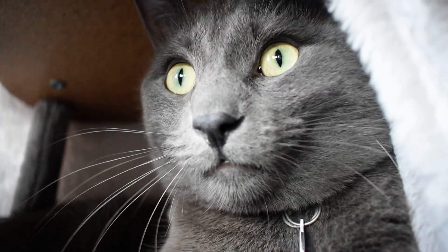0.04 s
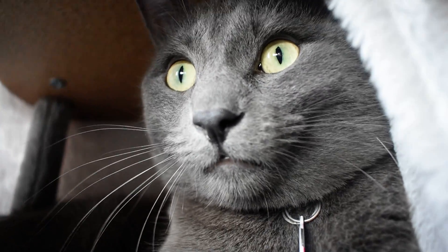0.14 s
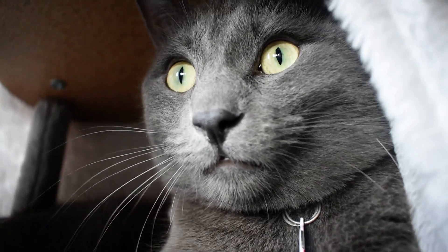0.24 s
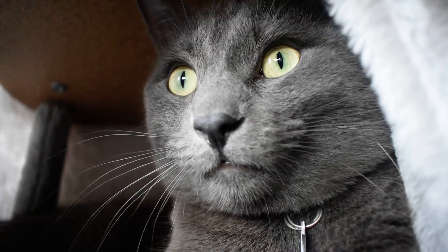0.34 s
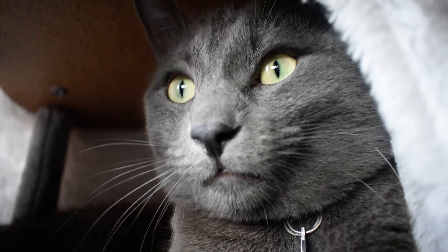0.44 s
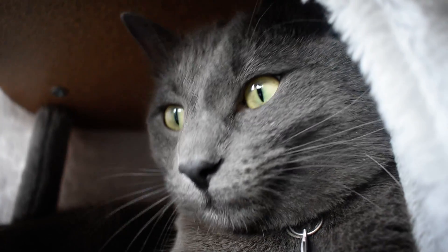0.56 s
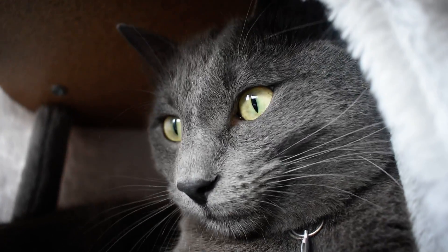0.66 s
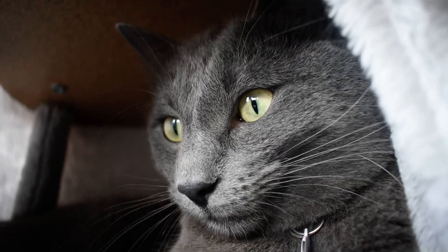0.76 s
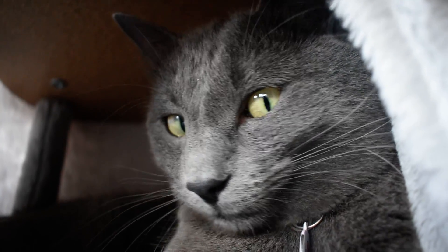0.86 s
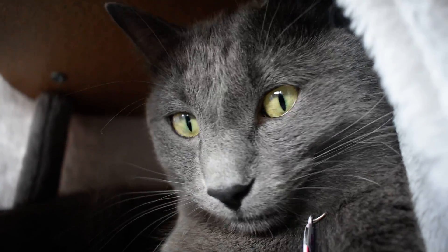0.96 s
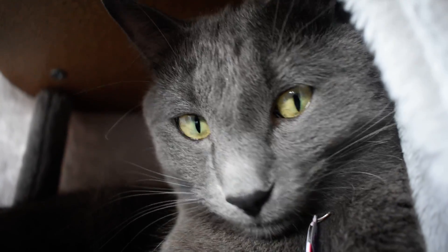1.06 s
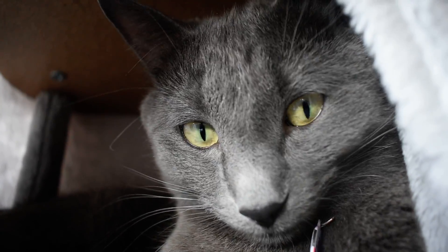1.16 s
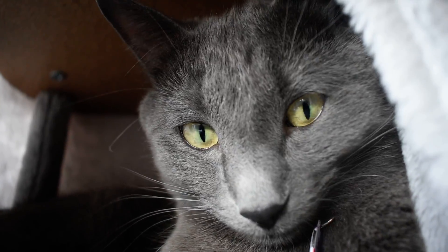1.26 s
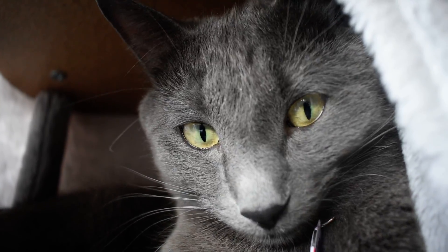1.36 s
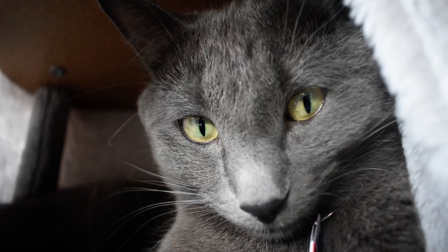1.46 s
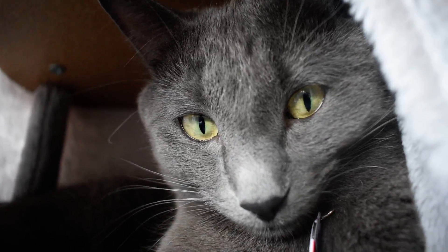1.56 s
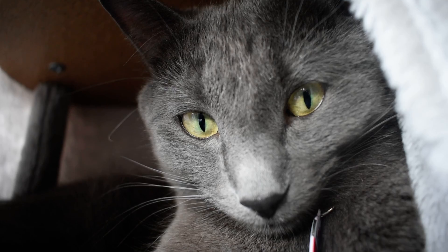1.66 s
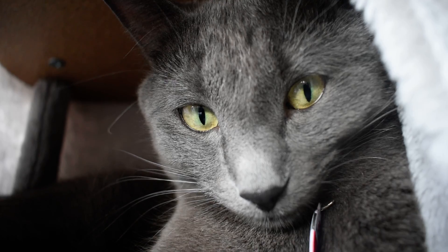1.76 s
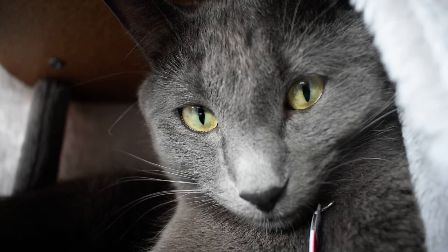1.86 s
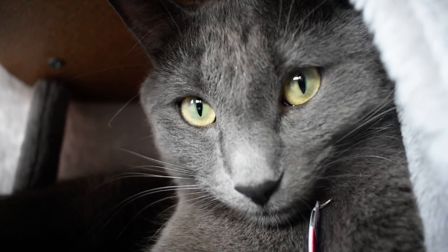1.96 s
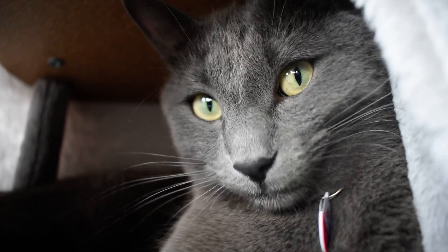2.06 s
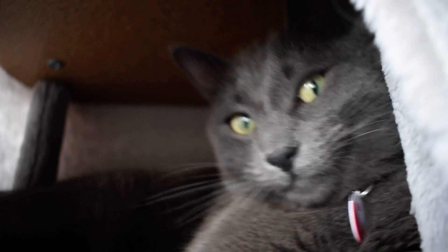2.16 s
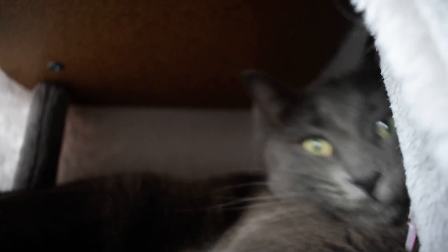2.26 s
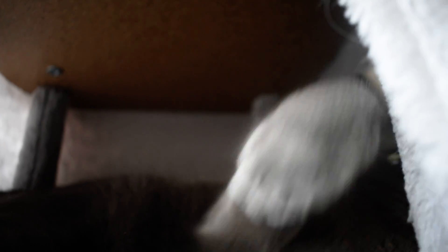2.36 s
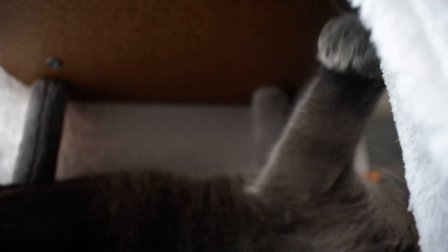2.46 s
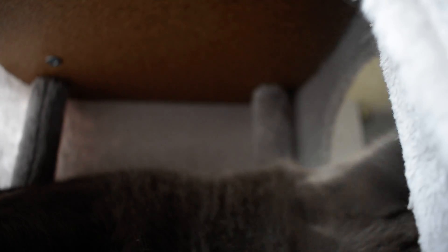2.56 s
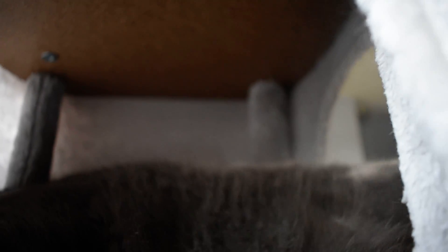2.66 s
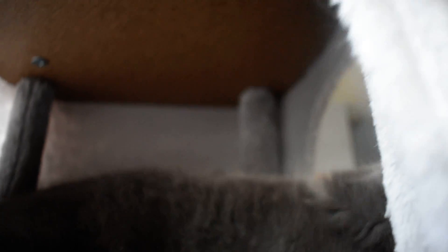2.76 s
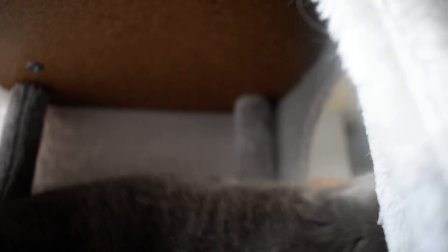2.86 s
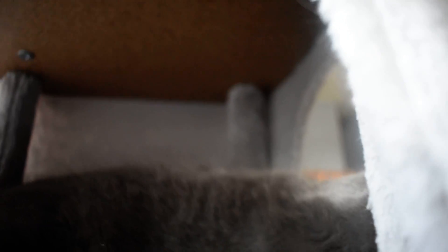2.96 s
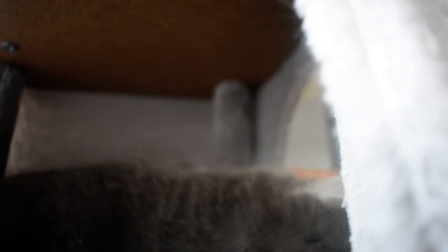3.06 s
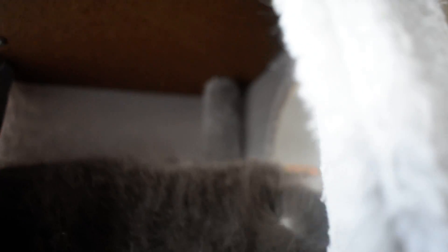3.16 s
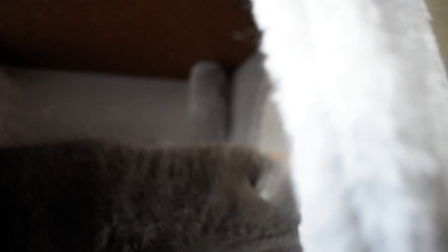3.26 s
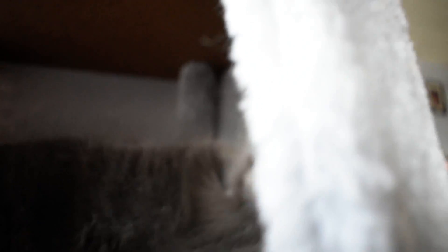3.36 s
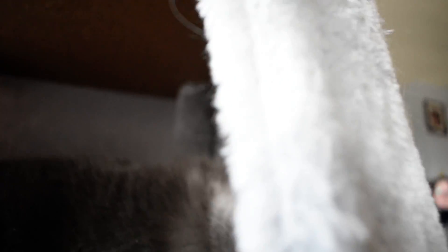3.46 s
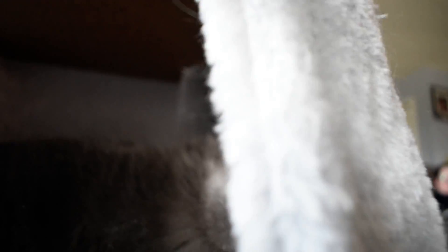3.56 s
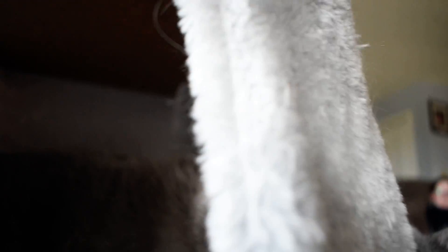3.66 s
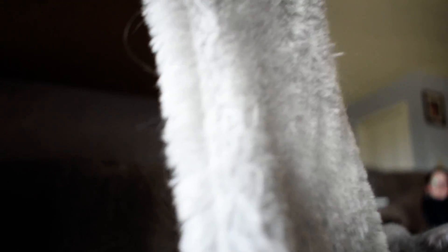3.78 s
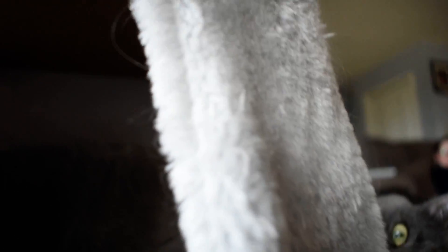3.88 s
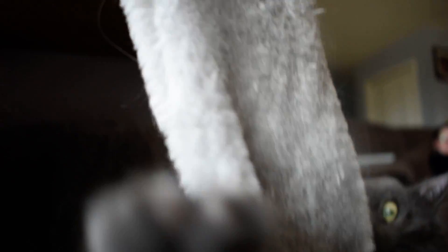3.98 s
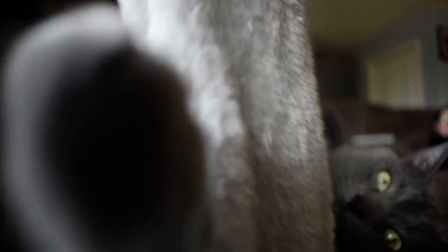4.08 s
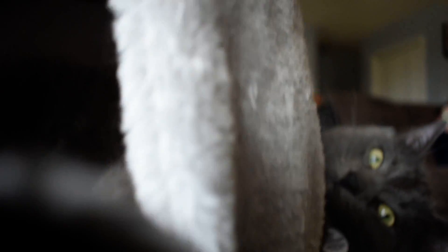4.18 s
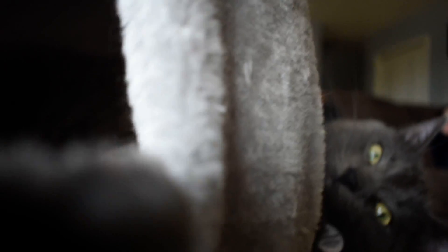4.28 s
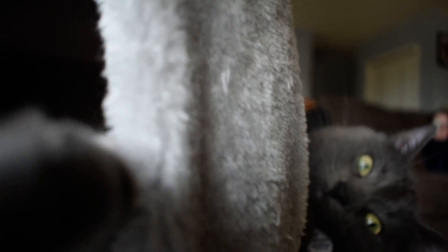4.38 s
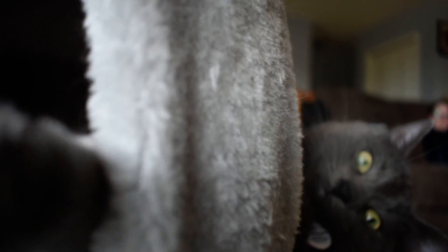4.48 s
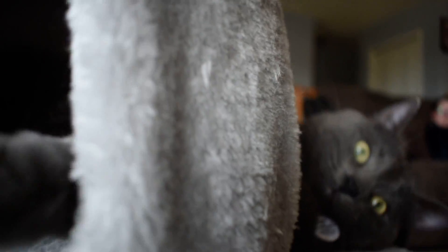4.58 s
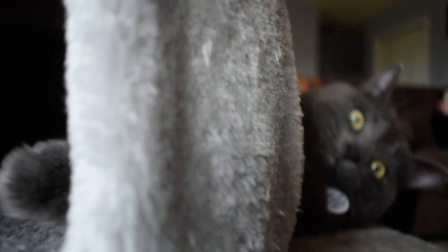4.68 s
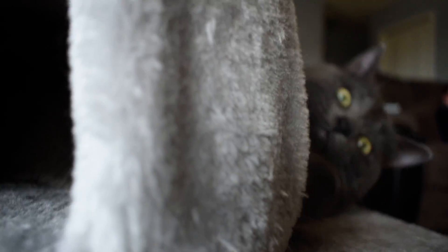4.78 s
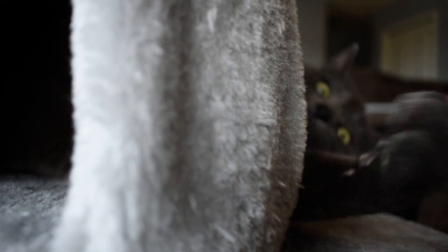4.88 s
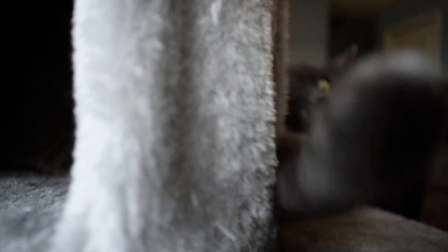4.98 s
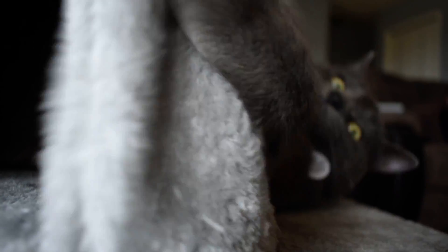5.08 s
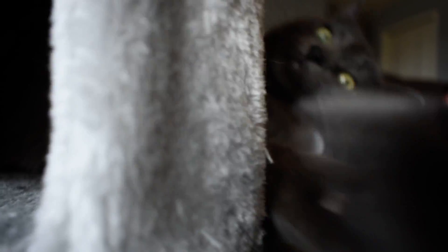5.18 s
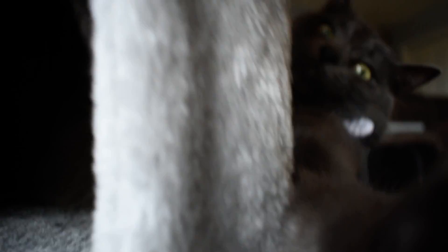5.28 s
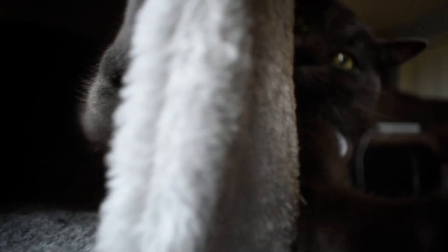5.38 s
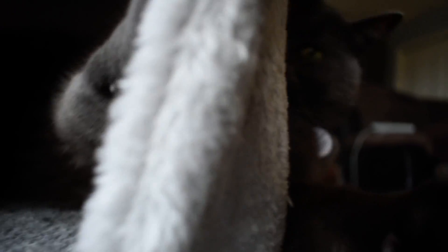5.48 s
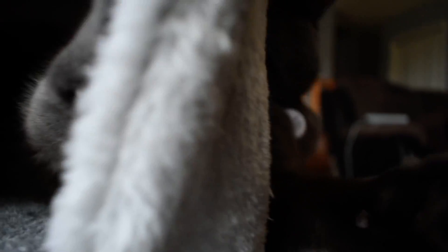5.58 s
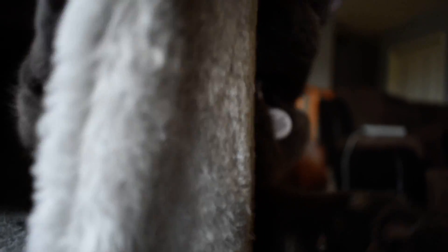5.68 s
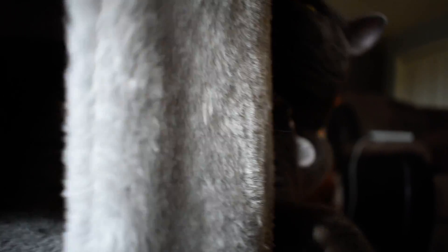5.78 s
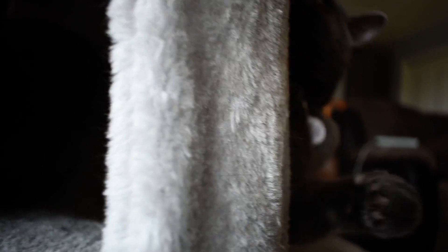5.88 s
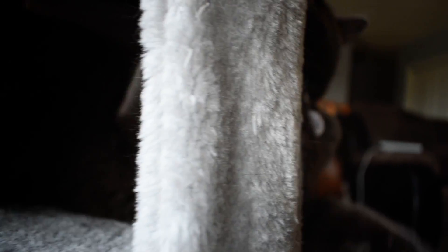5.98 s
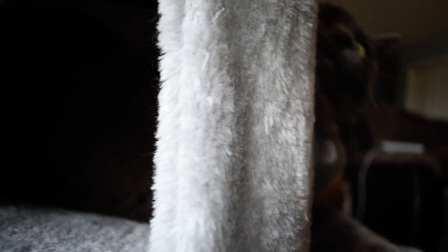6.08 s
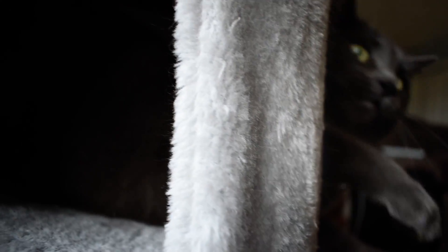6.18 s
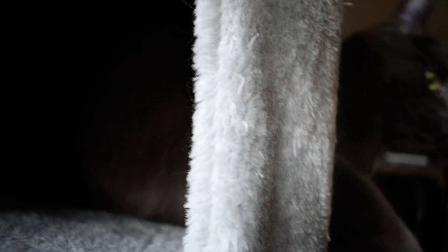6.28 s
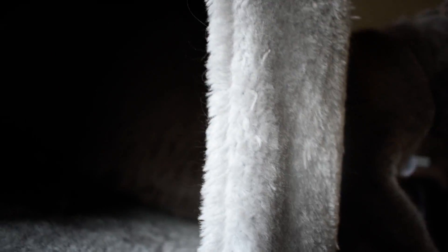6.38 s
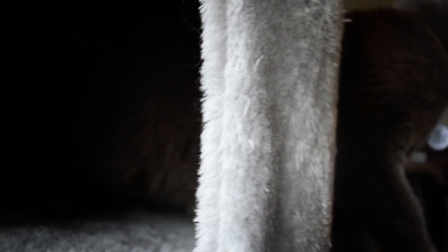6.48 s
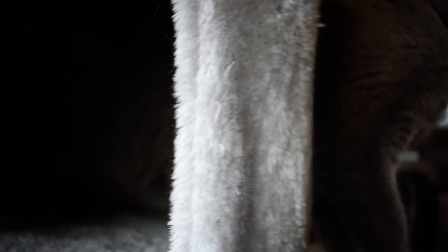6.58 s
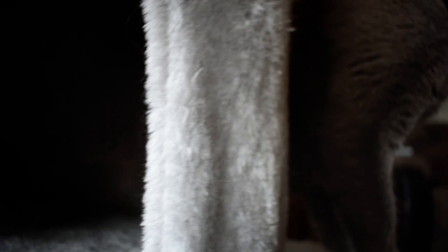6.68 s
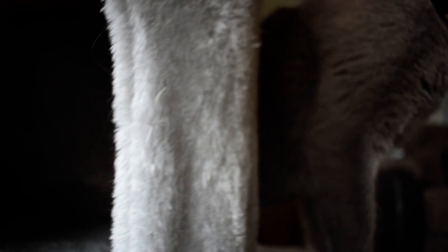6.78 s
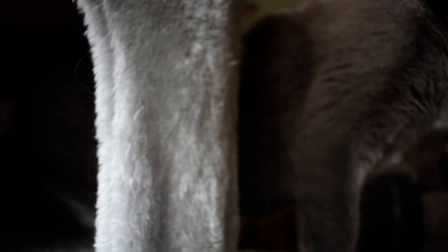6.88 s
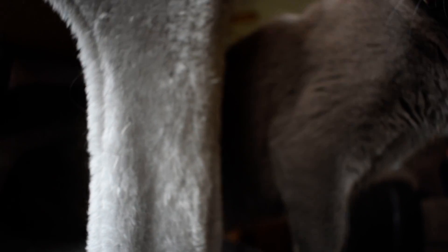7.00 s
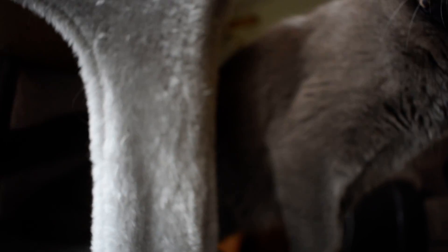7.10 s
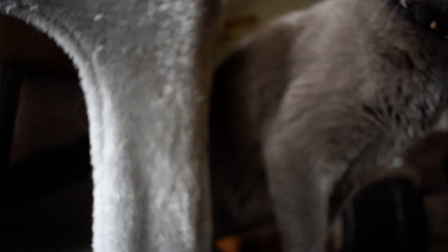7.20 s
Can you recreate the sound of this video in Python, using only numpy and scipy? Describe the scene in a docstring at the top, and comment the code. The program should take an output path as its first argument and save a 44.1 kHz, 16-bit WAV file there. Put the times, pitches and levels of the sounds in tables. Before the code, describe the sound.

Fur and plush rustle close to the microphone as a cat paws at it, with soft bumps and one sharp, rattling knock.

```python
"""Fur and plush rustle close to the microphone as a cat shifts in a cat tree and bats at a handheld camera.
Hair tips hiss and the backing cloth rubs; paws skid, claws snap free of the pile, and blows ring the
camera case, one swat landing as a sharp rattling knock. The collar tag rings with a faint dull clack
at first; later come two far wooden clunks, over a quiet room's appliance hum."""
import sys
import numpy as np
from scipy import signal
from scipy.fft import rfft, irfft
from scipy.io import wavfile

SR = 44100
rng = np.random.default_rng(int(sys.argv[2]) if len(sys.argv) > 2 else 0)


def dump(signal):
    """Clip the signal to [-1, 1] and save it as 16-bit WAV at the path in sys.argv[1]."""
    limited = np.clip(np.atleast_2d(signal).T, -1, 1)
    pcm = np.round(limited * 32767).astype(np.int16)
    wavfile.write(sys.argv[1], SR, pcm)


N = 319501
T = np.arange(N) / SR


def rustle(hissing, rubbing, catch_db=1.04, catch_hz=35):
    """Hair tips hiss, the cloth behind them rubs; both catch and slide together."""
    # spectra: f/Hz, level/dB
    hairs = [(300, -34), (1500, -8.5), (3000, 3.5), (4500, 3), (6800, 6), (8400, 2.5), (10000, -9),
             (12000, -19.5), (16000, -31)]
    backing = [(100, -17.5), (330, -2), (520, -2), (630, 2.5), (750, 2), (950, -2), (1300, -1.5),
               (2000, -1), (3000, -7.5), (5000, -13), (12000, -51)]
    hiss = colour(slips(N, per_s=6000, spread_db=1.0), hairs) * hissing
    rub = colour(slips(N), backing) * rubbing
    return (hiss + rub) * amp(catch_db * drift(catch_hz))


def sliding(rub_trim_db=-1.14):
    """Hiss and rub envelopes: fur gathers speed over plush, then stops; overlaps add in power."""
    # fur slides: t/s, swell/s, fade/s, hiss/dB, rub/dB
    slides = [(0.2, 0.18, 0.38, -63.5, -62), (0.48, 0.095, 0.071, -58.5, -55),
              (0.785, .03, 0.075, -58, -62), (0.98, 0.072, 0.057, -68, -66), (1.21, 0.15, .2, -59.5, -60),
              (1.36, 0.3, 0.079, -59, -51.5), (1.98, 0.27, 0.12, -59, -55.5), (2.6, 0.21, .15, -64, -54.5),
              (2.88, .06, .1, -63, -62), (3.102, 0.15, 0.34, -58, -56.5), (3.31, .012, .1, -49, -51),
              (3.35, .035, 0.061, -40.5, -43.5), (3.518, .16, 0.075, -46.5, -47.5),
              (3.77, 0.075, 0.098, -46, -53), (3.944, 0.023, 0.067, -46.5, -46),
              (4.14, 0.038, .12, -57, -56.5), (4.338, 0.035, 0.14, -57, -50),
              (4.715, .02, .12, -63.5, -58.5), (4.908, 0.061, 0.23, -53, -58),
              (5.08, 0.18, 0.26, -51.5, -55), (5.49, 0.066, 0.084, -54, -57.5), (5.72, 0.18, .06, -51, -56),
              (5.921, .14, 0.12, -46.5, -44), (6.17, 0.14, 0.066, -54, -60.5),
              (6.4, 0.096, .35, -64, -61.5), (6.76, 0.18, 0.21, -60.5, -61), (7.07, 0.16, 0.14, -58.5, -52)]
    power = np.zeros((2, N))
    for s, swell_s, fade_s, hiss_db, rub_db in slides:
        t = np.maximum(T - s, 0)
        swell = np.sin(np.pi / 2 * np.minimum(t / swell_s, 1)) ** 0.71
        fade = np.exp(-(np.maximum(t - swell_s, 0) / fade_s) ** 0.9)
        power += (amp([[hiss_db], [rub_db + rub_trim_db]]) * swell * fade) ** 2
    return np.sqrt(power)


def hollow(rubbing, hz=735, share_db=-9):
    """Rubbing excites one air resonance of the plush den."""
    return amp(share_db) * rubbing * unit(focus(slips(N), hz, octaves=0.24))


def blows(hard_db=-19):
    """A push and a short scuff ring the camera case; in hard blows a claw scrapes too."""
    # paw and claw hits, swat at 5.27 s: t/s, level over 10 ms/dB, f/Hz, width/oct
    hits = [(0.176, -53, 615, 0.4), (0.361, -54, 1200, 2), (0.551, -49, 1700, 1.3),
            (0.6341, -52, 1800, 0.94), (0.933, -50.5, 219, 0.89), (1.2, -55.5, 895, 0.96),
            (2.32, -46, 220, 1.5), (2.329, -44.5, 484, 2.3), (2.749, -50, 2290, 1.2),
            (2.761, -46.5, 2100, 1.2), (2.831, -51.5, 1200, 1.8), (3.032, -43.5, 222, 0.26),
            (3.665, -39.5, 330, 1.8), (4.088, -42.5, 88, 0.44), (4.1613, -38.5, 1910, 0.95),
            (4.1638, -38, 485, 1.25), (5.2708, -22, 5320, 0.35), (5.2713, -27, 239, 0.59),
            (5.2793, -20.5, 1700, 0.83), (5.285, -18.5, 1380, 0.32), (5.2902, -32, 4670, 0.61),
            (5.2961, -27, 286, 0.72), (5.2967, -26.5, 1900, 1), (5.3162, -45, 3840, 1.3),
            (5.3674, -41.5, 230, 1.1)]
    # case modes: f/Hz, level/dB, t60/s
    modes = [(130, -19, .05), (244, -4.5, 0.03), (414, -2.5, 0.021), (600, -20, .02), (703, 1, 0.013),
             (997, 2.5, 0.015), (1360, -9.5, 0.02), (1510, -1, 0.016), (1670, -6.5, 0.034),
             (2204, 0.5, 0.0071), (2750, 5, 0.0054), (3620, -1.5, 0.0076), (4650, 2, 0.0028),
             (6500, -0.5, 0.0024), (8200, -4, 0.0092)]
    out, t = np.zeros(N), T[:SR // 8]
    case = sum(amp(db - 60 * t / t60) * np.sin(2 * np.pi * hz * t) for hz, db, t60 in modes)
    for s, db, hz, octaves in hits + patter():
        push = amp(0.15 * (db - hard_db)) * (t == 0)
        scuff_s = 0.0024 * (1000 / hz) ** 0.43  # low, padded blows stay longer
        scuff = 0.13 * slips(len(t)) * np.exp(-t / scuff_s)
        ring = focus(signal.fftconvolve(push + scuff, case)[:len(t)], hz, octaves)
        rms_10ms = np.sqrt(np.sum(ring ** 2) / (SR / 100))
        add(out, s, amp(db) * ring / rms_10ms)
        scrape = skid(hz=8370, octaves=1.0, fade_s=0.0028, rise_s=0.00075, top_hz=9800)
        add(out, s, amp(-23 + 1.67 * (db - hard_db)) * scrape)
    return out


def patter(span_s=(0.082, 0.97), per_s=13, db=-56, hz=746, octaves=0.89):
    """Faint, loosely spaced handling taps, as rows for blows()."""
    slots = np.arange(*span_s, 1 / per_s)
    jitter = rng.uniform(-1, 1, (len(slots), 3))
    return [(s + (1 + late) / (2 * per_s), db - softer_db, hz * 2 ** (0.4 * pitch), octaves)
            for s, (late, softer_db, pitch) in zip(slots, jitter)]


def shoves():
    """One slow pressure swing each time the whole camera is pushed."""
    # pushes: t/s, level/dB, time constant/s
    pushes = [(4.051, -46, 0.0045), (5.275, -31, 0.0014), (5.301, -36, 0.0025), (5.372, -46.5, 0.0048),
              (5.642, -49, 0.0056)]
    out = np.zeros(N)
    for s, db, tau_s in pushes:
        u = T[:SR // 8] / tau_s
        add(out, s, amp(db) * 2 * u * (2 - u) * np.exp(-u))
    return out


def skids():
    """Short hissy skids: paw brushes on the pile, plus the bright edge of the two far clunks."""
    # bursts: t/s, level/dB, f/Hz, width/oct, fade/s
    bursts = [(1.531, -36.5, 7600, 0.21, 0.004), (1.54, -53, 6500, 0.56, 0.036),
              (2.748, -49, 7000, 0.63, 0.013), (3.316, -43, 8600, 0.21, 0.056),
              (3.522, -45.5, 6460, 0.68, 0.036), (3.569, -42.5, 7450, 1.8, 0.015),
              (3.9506, -41, 7200, 0.38, 0.031), (4.497, -51.5, 6500, 1.8, 0.027),
              (5.264, -29, 1030, 1.4, 0.025), (5.312, -25, 1600, 1.8, 0.0049),
              (5.322, -37.5, 7000, 0.67, 0.023), (5.507, -47.5, 1570, 0.4, 0.095)]
    out = np.zeros(N)
    for s, db, hz, octaves, fade_s in bursts:
        add(out, s, amp(db) * skid(hz, octaves, fade_s))
    return out


def skid(hz, octaves, fade_s, rise_s=0.0014, top_hz=8700):
    """A band of gritty hiss that starts fast and fades."""
    t = T[:SR // 3]
    hiss = unit(muffle(focus(slips(len(t)), hz, octaves), top_hz))
    return hiss * (1 - np.exp(-t / rise_s)) * np.exp(-t / fade_s)


def snags(rasp_s=0.00092):
    """A thread lets go of a claw with a tiny snap."""
    # releases: t/s, peak/dB, f/Hz
    releases = [(2.622, -40.5, 4800), (5.661, -36, 5030), (5.877, -25.5, 5050), (6.205, -26.5, 4350),
                (6.4643, -40, 5500), (6.538, -29, 7000), (6.791, -35.5, 7300), (7.1846, -26, 6500),
                (7.216, -31.5, 6200)]
    out, t = np.zeros(N), T[:SR // 50]
    for s, db, hz in releases:
        rasp = 0.086 * slips(len(t)) * np.exp(-t / rasp_s)
        snap = muffle(focus((t == 0) + rasp, hz, octaves=1.0), top_hz=1.34 * hz)
        add(out, s, amp(db) * snap / abs(snap).max())
    return out


def tag(rise_s=0.00081):
    """The metal disc on the collar taps its ring and rings out."""
    # disc modes: f/Hz, level/dB, t60/s
    modes = [(1040, -60, .3), (1620, -61, 0.32), (2460, -59, 0.25), (4021, -70, .4), (4140, -65, .3),
             (5023, -69, 0.32), (5313, -72, .3), (6040, -56, 0.16), (6347, -65, 0.28), (6800, -57, 0.18),
             (7050, -58, 0.33), (7720, -60, .28), (9130, -57, 0.19)]
    # taps: t/s, gain/dB
    taps = [(0.0, 2), (0.039, -1)]
    out, t = np.zeros(N), T[:SR // 2]
    for s, tap_db in taps:
        ring = sum(amp(db - 60 * t / t60) * np.sin(2 * np.pi * (hz * t + rng.random()))
                   for hz, db, t60 in modes)
        add(out, s, amp(tap_db) * ring * (1 - np.exp(-t / rise_s)))
    return out


def clunks(clatter_s=0.0046, rise_s=0.001):
    """The tag's dull clack, then two far wooden clunks: brief clatter, then mostly the room."""
    # knocks: t/s, level/dB, f/Hz, width/oct
    knocks = [(0.002, -51, 800, 1.9), (1.5335, -33, 750, 0.61), (1.54, -48, 130, 0.94),
              (1.5414, -38, 1200, 0.77), (1.5805, -39.5, 950, 0.55), (4.478, -39.5, 1600, 0.59),
              (4.493, -39.5, 610, 0.35), (4.502, -45.5, 2030, 0.58), (4.516, -40, 1110, 0.79)]
    out = np.zeros(N)
    for s, db, hz, octaves in knocks:
        tail = room_tail()
        t = T[:len(tail)]
        clatter = 2.2 * slips(len(t)) * np.exp(-t / clatter_s)
        edges = (1 - np.exp(-t / rise_s)) * np.minimum(1, 10 * (1 - t / t[-1]))
        clunk = focus(wood(tail + clatter) * edges, hz, octaves)
        add(out, s, amp(db) * clunk / np.std(clunk[:SR // 25]))
    return muffle(out, top_hz=8500)


def wood(x):
    """Broad resonances of a wooden board."""
    # board modes: f/Hz, width/Hz, level/dB
    modes = [(112, 9, 5), (260, 240, -4.5), (604, 160, -1), (773, 69, 2.5), (790, 98, -6), (936, 70, 1.5),
             (1217, 37, 5.5), (1360, 150, -5.5), (1700, 380, -5), (2200, 220, -2.5), (2700, 330, -7.5),
             (3170, 230, -2.5), (4200, 1900, -3.5), (7000, 2900, -5)]
    f = bins(x)
    power = sum(amp(db) ** 2 / (1 + (2 * (f - hz) / width_hz) ** 2) for hz, width_hz, db in modes)
    return irfft(rfft(x) * np.sqrt(power), len(x))


def shelves(x):
    """Nearby posts and shelves comb the sound; power is kept."""
    # reflections: delay/s, level/dB
    reflections = [(0.0016, -33), (0.0029, -26), (0.0047, -22.5), (0.0071, -22), (0.0099, -14.5)]
    out = x.copy()
    for delay_s, db in reflections:
        add(out, delay_s, amp(db) * x)
    return out * np.std(x) / np.std(out)


def room_tail():
    """Dense reflections; the bass lasts longest."""
    # room decay: f/Hz, t60/s
    decay = [(100, 1), (700, 0.46), (1500, 0.46), (3000, 0.43), (8000, 0.55)]
    hz, t, spectra = signal.stft(rng.standard_normal(SR // 2), SR, nperseg=256)
    fade = amp(-60 * t / read(decay, hz)[:, None])
    return signal.istft(spectra * fade, SR, nperseg=256)[1]


def room_tone(air_db=-56, waver_db=2.0, waver_hz=1.398):
    """Still air and the wavering hum of a household appliance."""
    # air spectrum: f/Hz, relative density/dB
    air = [(20, -10), (40, -4.5), (75, 4.5), (130, 3), (200, 1.5), (290, -3.5), (480, -4.5), (800, -6.5),
           (1500, -10.5), (3000, -14), (7500, -20.5), (10500, -27.5), (15000, -34)]
    # hum tones: f/Hz, rms/dB
    hum = [(119.6, -64.5), (177, -70), (196, -67)]
    out = amp(air_db) * colour(rng.standard_normal(N), air)
    for hz, db in hum:
        peak = np.sqrt(2) * amp(db + waver_db * drift(1.1))
        cycles = np.cumsum(hz + waver_hz * drift(2.96)) / SR
        out += peak * np.sin(2 * np.pi * cycles)
    return out


def slips(count, per_s=9000, spread_db=1.5):
    """Hairs slip one by one: dense uneven clicks over a fine wash, rms 1."""
    size = amp(spread_db * np.minimum(rng.exponential(1, count), 4))
    clicks = size * rng.choice([-1, 1], count) * (rng.random(count) < per_s / SR)
    return unit(clicks + 0.12 * rng.standard_normal(count))


def drift(corner_hz):
    """Slow random wander, rms 1."""
    noise = rng.standard_normal(N)
    return unit(irfft(rfft(noise) / (1 + (bins(noise) / corner_hz) ** 4), N))


def focus(x, hz, octaves, skirt_db=36, size=4096):
    """Minimum-phase band around hz: hard contacts sound high, padded ones low."""
    f = abs(np.fft.fftfreq(size, 1 / SR)) + 10
    away = (np.log2(f / hz) / octaves) ** 2
    log_gain = np.log(amp(-skirt_db * away / (away + 5)))
    taps = np.fft.ifft(np.exp(np.conj(signal.hilbert(log_gain)))).real
    return signal.fftconvolve(x, taps[:size // 2])[:len(x)]


def muffle(x, top_hz):
    """Softens the top treble, as the microphone rolls off."""
    return signal.sosfilt(signal.butter(4, top_hz, fs=SR, output="sos"), x)


def colour(x, spectrum):
    """Shapes x by a spectrum, rms 1."""
    return unit(irfft(rfft(x) * amp(read(spectrum, bins(x))), len(x)))


def read(points, hz):
    """Interpolates over log frequency."""
    f, value = np.transpose(points)
    return np.interp(np.log(hz + 1), np.log(f + 1), value)


def bins(x):
    """FFT frequencies/Hz."""
    return np.fft.rfftfreq(len(x), 1 / SR)


def amp(db):
    """dB to gain."""
    return 10 ** (np.asarray(db) / 20)


def unit(x):
    """Scales to rms 1."""
    return x / np.sqrt(np.mean(x ** 2) + 1e-20)


def add(mix, s, sound):
    """Mixes a sound in at time s."""
    part = mix[max(round(s * SR), 0):][:len(sound)]
    part += sound[:len(part)]


def scene(wet_db=-28):
    """Contacts at the microphone are nearly dry; rustle and clunks arrive past the shelves."""
    near = blows() + skids() + snags()
    tail = room_tail()
    echo = signal.fftconvolve(near, tail / np.linalg.norm(tail))[:N]
    hissing, rubbing = sliding()
    around = shelves(rustle(hissing, rubbing) + clunks())
    return (near + amp(wet_db) * echo + shoves() + around + hollow(rubbing) + tag() + room_tone())[None]


def record(dry, edge_hz=15850):
    """The camera's band limit."""
    lowpass = signal.firwin(511, edge_hz, window=("kaiser", 9), fs=SR)
    return signal.oaconvolve(dry, lowpass[None], "same")


dry = scene()
out = record(dry)
dump(out)
```